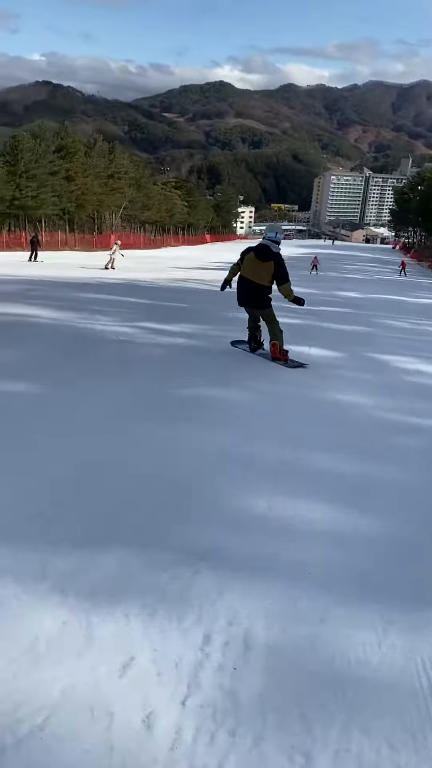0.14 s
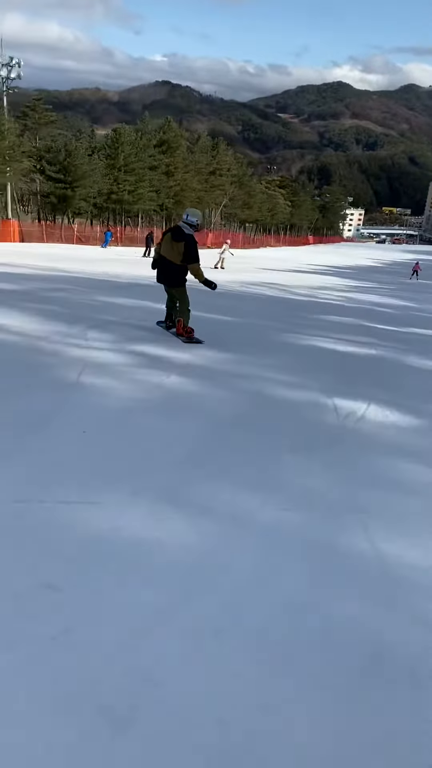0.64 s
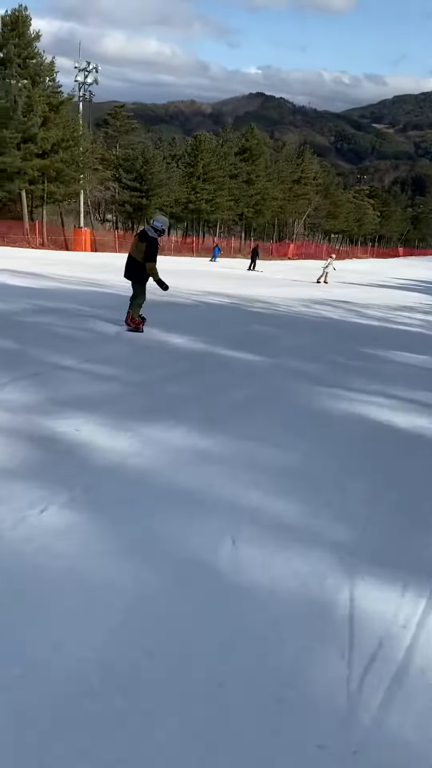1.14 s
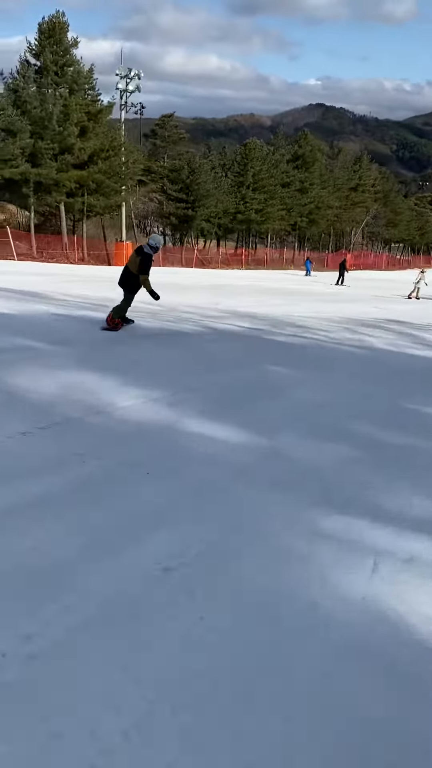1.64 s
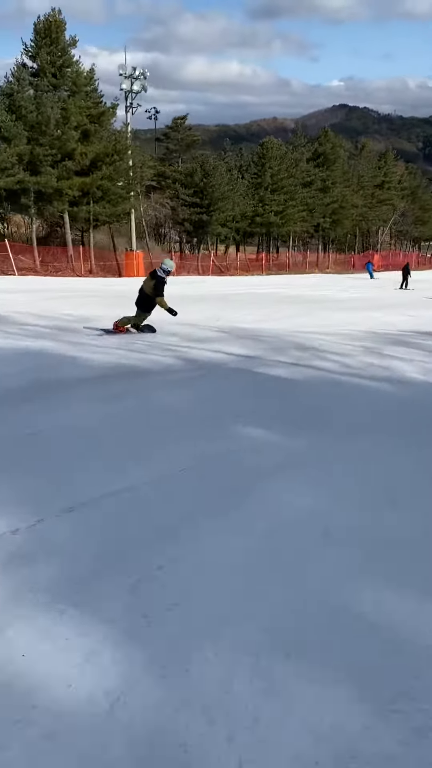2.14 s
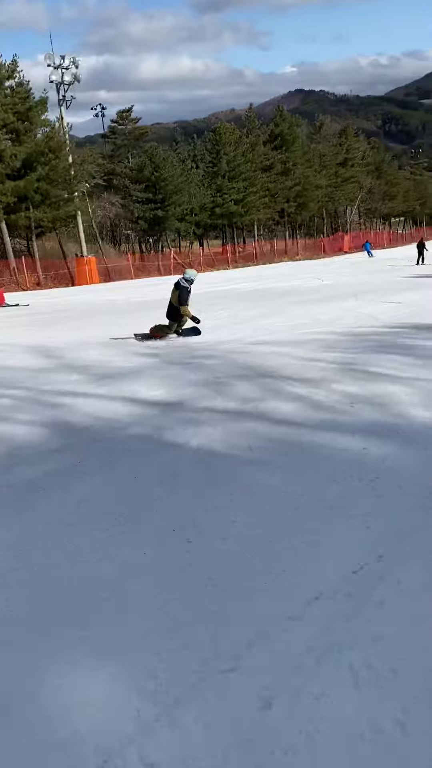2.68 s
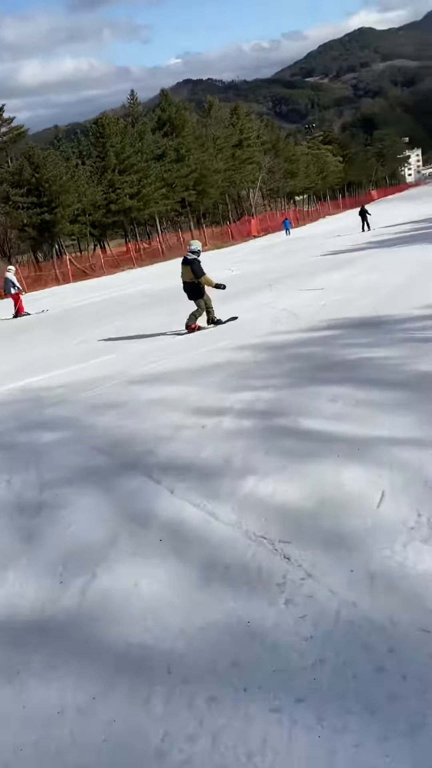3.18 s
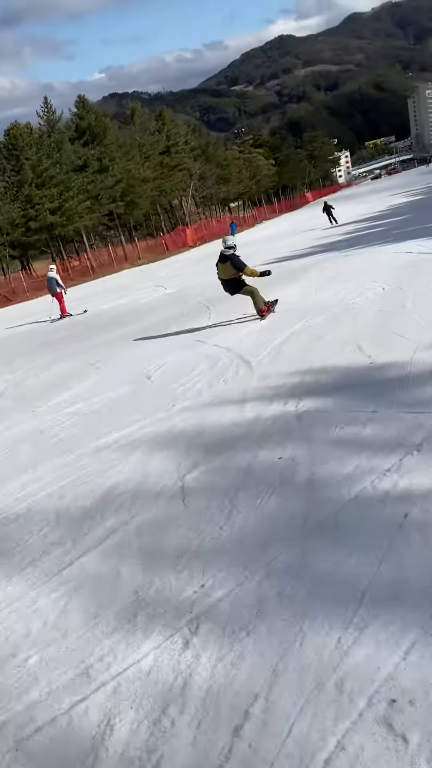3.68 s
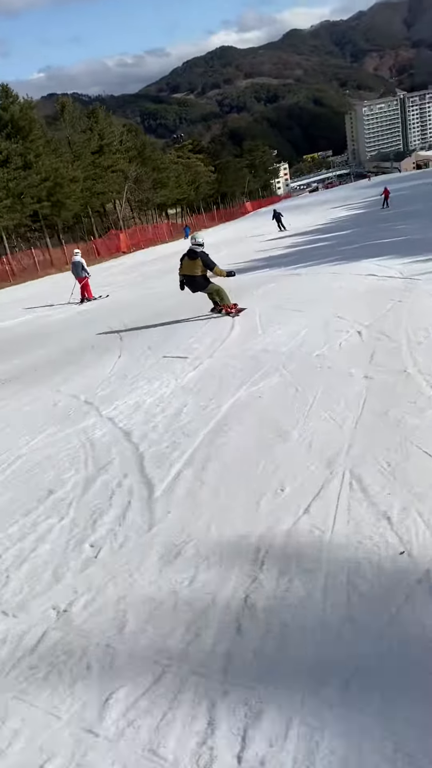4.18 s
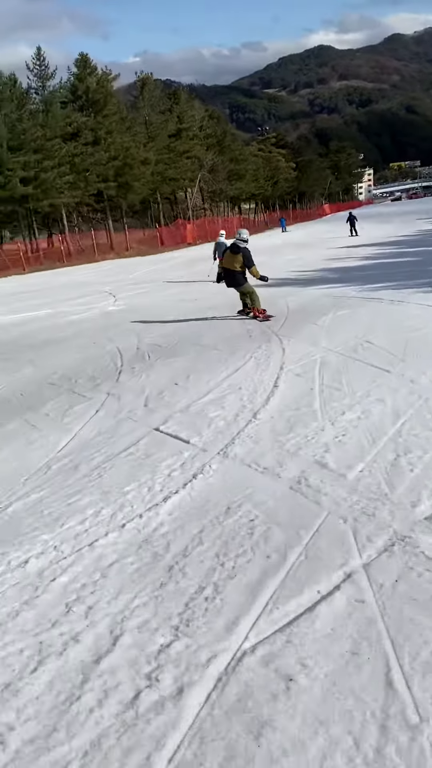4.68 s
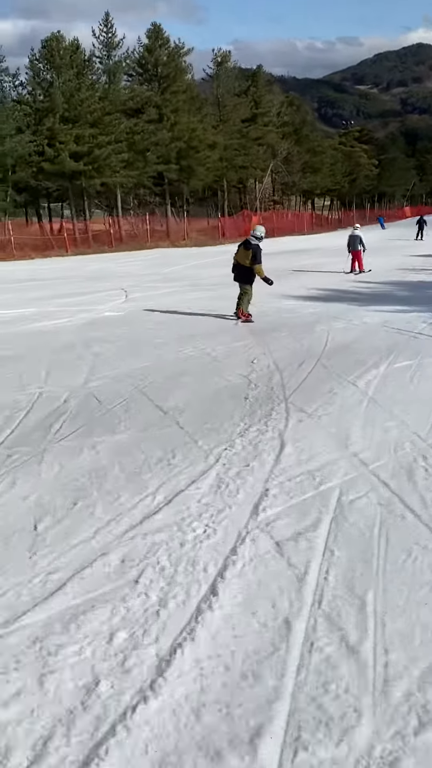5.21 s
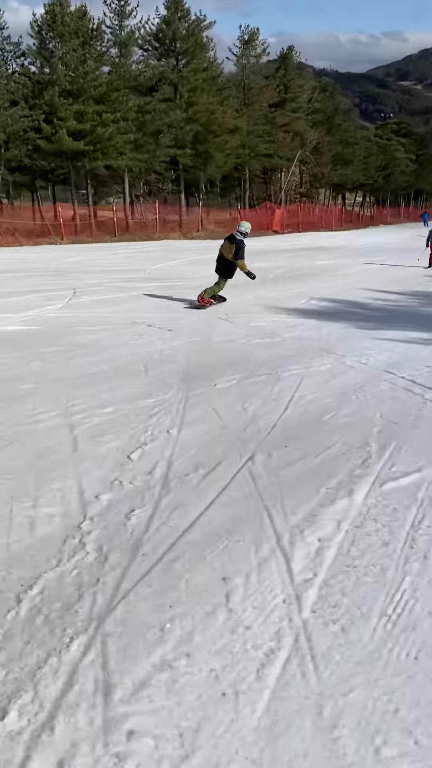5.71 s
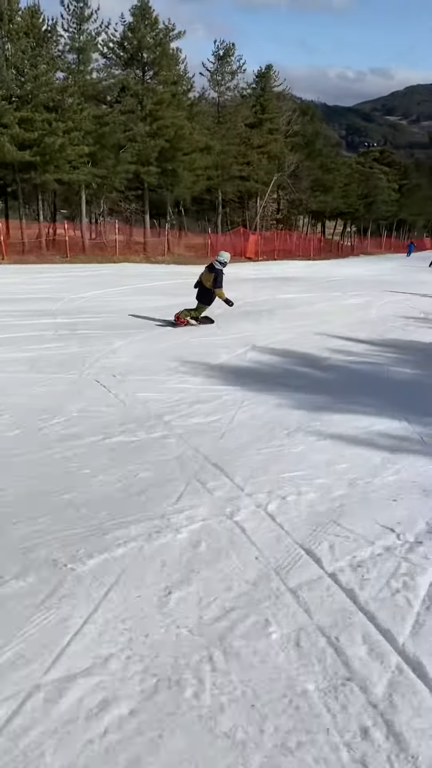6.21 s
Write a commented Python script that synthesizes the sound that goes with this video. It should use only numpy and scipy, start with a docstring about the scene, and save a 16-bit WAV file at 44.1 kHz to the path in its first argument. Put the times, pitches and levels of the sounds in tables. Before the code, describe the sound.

A snowboard edge roars and rasps over packed snow, surging and easing through turns, while headwind rumbles and flutters in gusts on a moving phone microphone.

```python
"""A board carves down packed snow: its body roars in two main modes, a weaker shoulder above them.
It jolts over ridges, rasps where its edge bites and throws a hiss of spray; the roar eases between turns.
The board sounds are noise through resonances, the snow is patchy coloured noise.
The rider holds a phone: headwind rumbles in its bass and flutters in spiky gusts across its two
microphone ports, made from uneven low noise and from spurts of noise mostly opposed left and right."""
import sys
import numpy as np
from scipy import signal
from scipy.fft import rfft, irfft, next_fast_len
from scipy.io import wavfile
from scipy.ndimage import uniform_filter1d, map_coordinates

SR = 44100
rng = np.random.default_rng(int(sys.argv[2]) if len(sys.argv) > 2 else 0)


def store_wav(level_fs):
    """Save 16-bit WAV to argv[1]."""
    pcm = np.round(np.clip(np.atleast_2d(level_fs), -1, 1) * 32767)
    wavfile.write(sys.argv[1], SR, pcm.T.astype(np.int16))


def convert_level_to_amplitude(level_db):
    """Map a level in decibels to its linear amplitude factor."""
    exponent = np.asarray(level_db, float) / 20
    return 10 ** exponent


N = 279594  # length in samples
HZ = np.fft.rfftfreq(512, 1 / SR)[:, None]  # frequencies of the short noise frames
SIDES = np.array([[1], [-1]])  # left, right

# board modes at pitch ratio 1, rows low, upper and shoulder: centre f/Hz, width of a single pass/Hz
BOARD_MODES = [(350, 249), (660, 164), (1050, 460)]
# steady headwind under the gusts: t/s, level/dB, eddy size as bass tilt/(dB per octave)
HEADWIND = [(0, -34, -1.5), (.7, -34, 0.5), (1.5, -29, -0.5), (2, -24.5, -1.5), (2.5, -31.5, -3),
            (2.9, -35.5, 1), (3.5, -27, -3), (4.3, -37.5, 1), (4.8, -21, -1.5), (5.45, -40, 1),
            (6.34, -28.5, -4)]


def unit(x):
    """Scaled to rms 1."""
    return x / np.sqrt(np.mean(x ** 2) + 1e-20)


def curves(rows, s=np.arange(N) / SR):
    """Each column after the time, read at the times s."""
    t, *cols = np.transpose(rows)
    return [np.interp(s, t, c) for c in cols]


def along(points, hz):
    """Each column after the frequency, read on a log axis."""
    f, *cols = np.transpose(points)
    return [np.interp(np.log(hz + 1), np.log(f + 1), c) for c in cols]


def wobble(rate):
    """A smooth random curve through rate random knots a second."""
    knots = rng.standard_normal(N // 64)
    return map_coordinates(knots, [np.arange(N) * rate / SR])


def bumps(s, height, half_s):
    """A sum of bell-shaped swells, each down to 1/e at half_s seconds from its peak."""
    t = np.arange(0, N, 32) / SR
    swell = (height * np.exp(-((t[:, None] - s) / half_s) ** 2)).sum(1)
    return np.interp(np.arange(N) / SR, t, swell)


def filtered(x, response):
    """x times a complex response of frequency."""
    m = next_fast_len(N + SR // 2)
    return irfft(rfft(x, m) * response(np.fft.rfftfreq(m, 1 / SR)), m)[..., :N]


def noise(patchy_db, shape=lambda s: 1 + 0 * HZ, channels=1):
    """Noise of rms 1 with random patches of gain; shape(times) is a spectrum that may move."""
    _, s, z = signal.stft(rng.standard_normal((channels, N)), SR, nperseg=512)
    # smoothing over frequency, then over time, makes the patches
    field = uniform_filter1d(rng.standard_normal(z.shape[1:]), size=6, axis=0)
    field = uniform_filter1d(field, size=8, axis=1)
    gain = shape(s)
    gain = gain / np.sqrt(np.mean(gain ** 2, axis=0))
    _, x = signal.istft(z * gain * convert_level_to_amplitude(patchy_db * unit(field)), nperseg=512)
    return unit(x[:, :N])


def heard(table, pair):
    """Two noises coloured and spread over the ports with a level, a phase and a likeness per frequency."""
    def ports(hz):
        db, pan_db, lead, alike = along(table, hz)
        turn = np.arccos(np.clip(alike, 0, 1)) / 2  # how much of the second noise sets the ports apart
        gain = convert_level_to_amplitude(db + SIDES * pan_db / 2) * np.exp(.5j * SIDES * lead)
        return gain * [[np.cos(turn)], [np.sin(turn)]] * [[[1], [1]], SIDES]
    return unit(filtered(pair[:, None], ports).sum(0))


def mode(hz, centre_hz, width_hz):
    """A resonance applied twice, so its skirts fall steeply."""
    once = 1j * hz * width_hz / (centre_hz ** 2 - hz ** 2 + 1j * hz * width_hz)
    return once ** 2


def board(chatter):
    """The edge chatters over the snow and shakes the board's modes, whose pitches shift with its load."""
    # edge bite: t/s, low mode level/dB, twist as upper mode level re low/dB
    carve = [(0, -25.5, -1), (.6, -20, -5.5), (.75, -25, -3.5), (1.25, -26.5, -5), (1.6, -22.5, -13),
             (2.1, -22, -21.5), (2.45, -30.5, -8.5), (2.62, -33.5, -12.5), (2.75, -41, -16),
             (2.88, -42, -4.5), (3.04, -30.5, -3), (3.11, -40.5, 3), (3.21, -28, -2), (3.39, -23, 4.5),
             (3.48, -14.5, -5.5), (3.63, -14, -3), (3.76, -21, 1.5), (4.11, -14, -4.5), (4.2, -20, -2.5),
             (4.5, -22.5, -4.5), (4.94, -23, -6.5), (5.01, -35.5, -1), (5.13, -31, -5), (5.22, -29, 2),
             (5.27, -29.5, -7), (5.51, -36, -1.5), (6.1, -24, -2.5), (6.34, -16, -9)]
    # load on the board: t/s, low mode pitch ratio, upper modes pitch ratio, upper limit of the roar f/Hz
    flex = [(0, 0.88, 0.99, 1320), (1, 0.95, 0.96, 1280), (1.6, 0.91, 0.89, 924), (2.2, 0.88, 1.1, 926),
            (2.55, 0.68, 1, 900), (2.75, 0.67, 0.92, 600), (2.9, 1.22, 0.96, 1000), (3.2, 1.22, 0.99, 1330),
            (3.7, 1.12, 0.97, 1280), (4.4, 1.085, 1.03, 1336), (4.9, 1.33, 1.01, 1350),
            (5.4, 0.9, 0.99, 1310), (6.34, 1.06, 0.96, 1330)]
    low_db, upper_db = curves(carve)
    # the shoulder's level re low mode grows with twist and with the low mode's pitch ratio
    shoulder_db = -12.5 + 0.56 * upper_db + 18 * (curves(flex)[0] - 1)

    def below_top(s):  # the top of the roar moves
        return 1 / (1 + (HZ / curves(flex, s)[2]) ** 10)

    out = np.zeros(N)
    for k, db in enumerate([low_db, low_db + upper_db, low_db + shoulder_db]):
        centre_hz, width_hz = BOARD_MODES[k]

        def ring(s):
            pitch = curves(flex, s)[min(k, 1)]
            return below_top(s) * abs(mode(HZ, centre_hz * pitch, width_hz))

        uneven_db = 1.0 * chatter + 0.27 * wobble(25) + 2.33 * wobble(90)
        shake = unit(noise(0.78, ring)[0] * convert_level_to_amplitude(uneven_db))
        out += convert_level_to_amplitude(db) * shake

    def to_ports(hz):
        lean = 1 + SIDES * 0.047 * (hz > 630)  # the upper modes come a little from the left
        return lean / (1 + (hz / 1400) ** 9)  # the roar stops steeply above the shoulder

    return filtered(out, to_ports)


def blows(s, db, hz, width_hz, life_s):
    """Short scuffing blows, each ringing one resonance."""
    t = np.arange(SR // 40) / SR
    envelope = (1 - np.exp(-t / 0.0009)) * np.exp(-t / life_s)
    scuffs = envelope * rng.standard_normal((len(s), len(t)))
    m = 4 * len(t)
    resonance = mode(np.fft.rfftfreq(m, 1 / SR), hz, width_hz)
    rings = irfft(rfft(scuffs, m) * resonance, m)[:, :2 * len(t)]
    rings = rings * convert_level_to_amplitude(db)[:, None] / abs(rings).max(1, keepdims=True)
    at = np.round(s * SR).astype(int)[:, None] + np.arange(2 * len(t))
    return np.bincount(at.ravel(), rings.ravel(), N)[:N]


def jolts():
    """A ridge deals the board a short blow and its modes ring briefly; now and then the crust cracks."""
    # jolts over ridges: t/s, upper mode peak level/dB, low mode level re upper/dB
    ridges = [(.027, -12.5, 2.5), (.216, -24, -11), (.577, -23, 4.5), (1.332, -18.5, 4), (1.486, -18, 10.5),
              (2.496, -22.5, 3), (3.012, -21, 3.5), (3.295, -10.5, -12), (3.347, -13, -14),
              (3.394, -8.5, -8.5), (3.464, -8, 4), (3.482, -1, -6.5), (3.538, -24, -5), (3.769, -16, -1),
              (4.5, -11.5, -3), (4.626, -24, -4), (4.785, -15, 0), (4.878, -13, -13), (4.926, -18, 10.5),
              (4.973, -9, -6), (5.172, -15.5, -12), (5.219, -23, -12), (5.844, -26.5, 9),
              (5.982, -16, -4.5), (6.042, -13.5, -5.5), (6.077, -17, 7.5), (6.153, -14, -4),
              (6.207, -12.5, -3), (6.26, -11, 3), (6.314, -28, -7)]
    # crust cracking under the edge: t/s, peak level/dB
    ticks = [(.027, -27.5), (0.217, -33), (.577, -32), (1.603, -26.5), (2.113, -36), (2.227, -34),
             (4.878, -40), (5.172, -35), (5.536, -40), (6.078, -31), (6.153, -29), (6.207, -33.5),
             (6.26, -25.5)]
    # resonance of the cracking crust: centre f/Hz, width of a single pass/Hz
    crack = (2600, 2200)
    s, db, low_db = np.transpose(ridges)
    low = blows(s, db + low_db, *BOARD_MODES[0], life_s=0.0056)
    upper = blows(s, db, *BOARD_MODES[1], life_s=0.0046)
    cracks = blows(*np.transpose(ticks), *crack, life_s=0.00092)
    return low + upper + cracks


def snow(chatter):
    """Crystals break under the edge as a rasp; the spray hisses above it, its colour following the turn."""
    # snow under the edge: t/s, fine rasp level/dB, scrape level re rasp/dB
    edge = [(0, -42, 6), (.35, -39.5, 0), (.66, -36.5, 1.5), (.75, -41, 3), (1.13, -43.5, 1),
            (2, -38.5, 2.5), (2.2, -37, 1), (2.3, -40.5, 2), (2.69, -45, -0.5), (2.75, -47, -19),
            (2.83, -46.5, -19), (2.92, -51, -7.5), (3.15, -48.5, -10), (3.3, -46, -5.5), (3.6, -37.5, 3),
            (4.1, -39.5, -0.5), (4.6, -43, 0.5), (4.87, -43, 0.5), (5.04, -49, -4), (5.5, -44, 0.5),
            (5.86, -39.5, -3), (5.97, -39.5, 1.5), (6.16, -37.5, 5), (6.34, -37.5, 3.5)]
    # the edge skids over an icy patch and the rasp flares: t/s, level re steady rasp/dB
    skids = [(.1, 4.5), (2.22, 2), (2.88, 8), (3.39, 2.5), (3.485, 9.5), (3.59, 1.5), (3.81, -1),
             (3.89, -0.5), (4.89, 3), (4.98, 0.5), (5.091, 8.5), (5.18, 6), (5.29, 6.5), (5.47, -1),
             (5.54, 2), (6.09, 2), (6.15, 1.5), (6.265, 3)]
    # thrown spray: t/s, level/dB, brightness/(dB per octave)
    mist = [(0, -47, 0), (.6, -49.5, 2), (1.2, -49, -2.5), (1.7, -49, 2), (2, -46.5, -4.5),
            (2.38, -43.5, -6), (2.6, -44.5, -5), (3.1, -46, -2), (3.4, -44, .5), (3.9, -42, 1.5),
            (4.4, -45, 1.5), (5, -49, -1.5), (5.4, -47.5, 1), (5.75, -43, 3.5), (5.94, -47.5, 1.5),
            (6.14, -43.5, -2.5), (6.34, -43.5, 1)]
    # scrape, rasp and spray as the two ports hear them:
    # f/Hz, relative level per Hz/dB, left re right/dB, left lead/rad, likeness/(0 to 1)
    scrape_ports = [(900, -34.5, -3.5, 0.048, 0.98), (1093, -3.5, 16, 0.39, 0.86), (1440, 1.5, 6, .6, .85),
                    (1672, -3, 0, 0.41, 1), (2000, -44, 0, .4, 0.9)]
    rasp_ports = [(1600, -27, 1, 0.2, .93), (1734, -6.5, 5, .35, 1), (2080, -6, -2.5, -0.16, .95),
                  (2380, -9.5, -3, 0.63, 1), (2805, -7, -1.5, 0.97, 0.64), (3330, -15, -1.5, .3, 0.48),
                  (4030, -13.5, 0, -0.58, 0.76), (4940, -17.5, -3.5, -0.51, 0.46),
                  (6340, -25.5, 0.5, -.3, 0.52), (7800, -59, 7, -.3, .6)]
    spray_ports = [(3480, -12.5, 0, 0.61, 1), (5450, 1, -1, 1.86, .8), (7070, -1, 0.083, 2.3, 0.69),
                   (8370, 0, 0, 2.98, 1), (9850, -2.5, 0, 3.14, 1), (11300, 0, 0, 3.43, 0.99),
                   (13000, -4.5, 0, 4.46, 0.73), (14200, -5.5, 0, 4.5, .6), (15700, -12, 0, 5.7, .5)]
    rasp_db, scrape_db = curves(edge)
    spray_db, _ = curves(mist)
    skid_db = bumps(*np.transpose(skids), half_s=0.016)
    grit = convert_level_to_amplitude(0.36 * chatter + 1.2 * wobble(9.2) + 1.5 * wobble(160))
    scrape = heard(scrape_ports, grit * noise(2.8, channels=2))
    rasp = heard(rasp_ports, grit * convert_level_to_amplitude(0.83 * wobble(22.004)) * noise(1.4, channels=2))

    def tilt(s):  # leans about 9 kHz, up to one octave either way
        octaves = np.clip(np.log2(HZ / 9000 + 1e-3), -1, 1)
        return convert_level_to_amplitude(curves(mist, s)[1] * octaves)

    puffing = convert_level_to_amplitude(.5 * chatter + 0.55 * wobble(7.2))
    spray = heard(spray_ports, puffing * noise(1.8, tilt, channels=2))
    return convert_level_to_amplitude(rasp_db + scrape_db) * scrape + convert_level_to_amplitude(rasp_db + skid_db) * rasp + convert_level_to_amplitude(spray_db) * spray


def gusts():
    """How far the gusts lift the wind over its steady level, in dB; their powers add."""
    # gusts hitting the phone: t/s, peak level/dB, half width of the power swell/s
    puffs = [(.12, -22.5, 0.076), (.3, -23, 0.013), (.56, -24, 0.02), (.88, -29, 0.081), (1.07, -28, .03),
             (1.16, -20, 0.02), (1.55, -25, 0.051), (1.73, -25, 0.01), (1.83, -27, 0.026),
             (2.379, -16, 0.024), (2.51, -19.5, 0.029), (2.64, -25, 0.031), (2.95, -26.5, 0.027),
             (3.05, -19.5, 0.027), (3.21, -23, .06), (3.42, -27.5, .04), (3.8, -23.5, 0.041),
             (3.91, -29, 0.11), (4.49, -19.5, 0.033), (4.73, -21, .045), (4.94, -20.5, 0.041),
             (5.07, -27.5, 0.016), (5.15, -20.5, .045), (5.33, -30, .035), (5.62, -25, 0.052),
             (5.81, -26, 0.042), (5.93, -21, 0.013), (6.05, -22, 0.029), (6.19, -18.5, 0.061),
             (6.33, -16, 0.018)]
    s, db, half_s = np.transpose(puffs)
    steady_power = convert_level_to_amplitude(curves(HEADWIND)[0]) ** 2
    return 10 * np.log10(1 + bumps(s, convert_level_to_amplitude(db) ** 2, half_s) / steady_power)


def rumble(gust_db):
    """Eddies of headwind push both ports alike, in lumps; larger eddies sound deeper."""
    # colour of the wind rumble: f/Hz, relative level per Hz/dB
    colour = [(13, -45.5), (22, -26), (40, -7.5), (64, 3.5), (190, -4.5), (221, -4.5), (255, -11.5),
              (300, -6.5), (390, -28.5), (660, -120)]

    def size(s):
        octaves_down = np.clip(np.log2(130 / (HZ + 20)), -1, 1)
        return convert_level_to_amplitude(curves(HEADWIND, s)[1] * octaves_down)

    push = unit(filtered(noise(0.95, size)[0], lambda hz: convert_level_to_amplitude(along(colour, hz)[0])))
    lumps = convert_level_to_amplitude(0.71 * wobble(20) + 2.75 * wobble(45))
    return convert_level_to_amplitude(curves(HEADWIND)[0] + gust_db) * unit(push * lumps)


def flutter(gust_db):
    """Wind across the ports, mostly opposed, in spurts that start sharply and fade with a 10 ms life."""
    # flutter, its band moving: t/s, level before gusts/dB, low edge f/Hz, top f/Hz
    moving_band = [(0, -42.5, 1000, 1550), (.6, -47.5, 870, 1660), (.9, -50, 860, 1660),
                   (1.3, -44, 680, 1410), (1.75, -33, 610, 1070), (2.1, -25, 576, 830),
                   (2.25, -30, 500, 775), (2.4, -31, 322, 760), (2.75, -32, 301, 880),
                   (3, -29.5, 298, 1300), (3.1, -38.5, 430, 1310), (3.28, -34, 940, 1660),
                   (3.48, -26, 950, 1630), (3.9, -30.5, 1060, 1680), (4.25, -33, 1090, 1640),
                   (4.9, -39, 1050, 1620), (5.2, -40.5, 1090, 1820), (5.42, -53, 1060, 2330),
                   (5.8, -49, 920, 2380), (6.15, -36.5, 920, 1600), (6.34, -40, 880, 1600)]
    gust_share = .12  # dB of flutter per dB that a gust stands over the steady wind

    def band(s):
        _, low_hz, top_hz = curves(moving_band, s)
        rise = (HZ / low_hz) ** 6
        return rise / (1 + rise) / (1 + (HZ / top_hz) ** 4.2)

    def shared_part(hz):  # the port cavity rings
        return 0.16 * (hz > 1900) * (hz < 6000) + .5 * abs(mode(hz, 2130, 400))

    chance = rng.random((2, N))
    kicks = (chance[0] < 60 / SR) * -np.log(1 - chance[1])  # about 60 a second, of random strength
    spurts = signal.lfilter([1], [1, -np.exp(-1 / (0.01 * SR))], kicks)
    spurts = convert_level_to_amplitude(1.2 * wobble(25)) * (0.6 + 0.78 * uniform_filter1d(spurts, size=50))
    pair = spurts * noise(2.1, band, channels=2)
    opposed = pair[0] * SIDES
    shared = filtered(pair[1], shared_part)
    level = convert_level_to_amplitude(curves(moving_band)[0] + gust_share * gust_db)
    return level * (opposed + shared) / np.std(pair[0])


def scene():
    """Board and rumble reach both ports nearly alike; snow and flutter are spread."""
    chatter = 0.14 * wobble(11) + 1.02 * wobble(30)  # dB, shared by board and snow
    gust_db = gusts()
    return board(chatter) + jolts() + snow(chatter) + rumble(gust_db) + flutter(gust_db)


def band_limit(x):
    """A steep low-pass at the top of the band."""
    return signal.sosfilt(signal.butter(12, 15790, fs=SR, output="sos"), x)


def record(dry):
    """The phone's input stage rounds off the highest peaks."""
    rounded = dry / (1 + abs(dry / .93) ** 6) ** (1 / 6)
    return band_limit(rounded)


dry = scene()
out = record(dry)
store_wav(out)
```